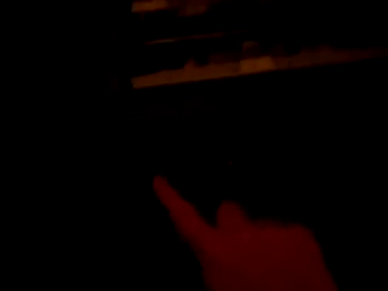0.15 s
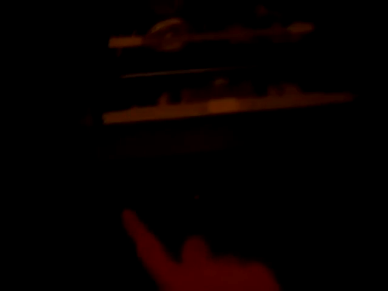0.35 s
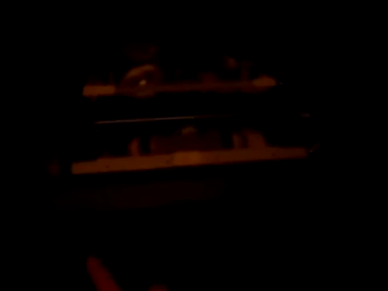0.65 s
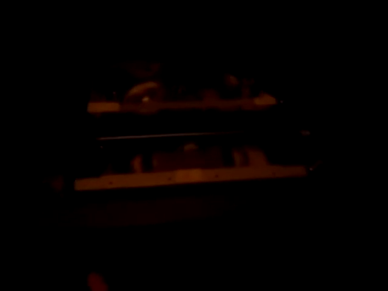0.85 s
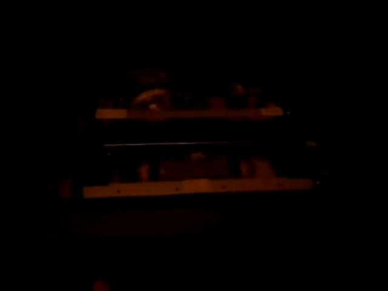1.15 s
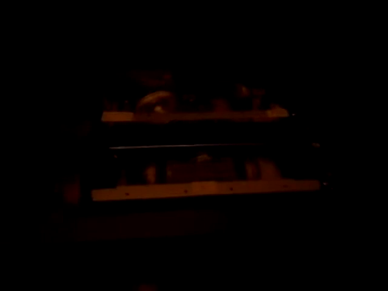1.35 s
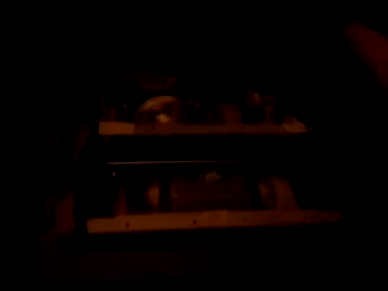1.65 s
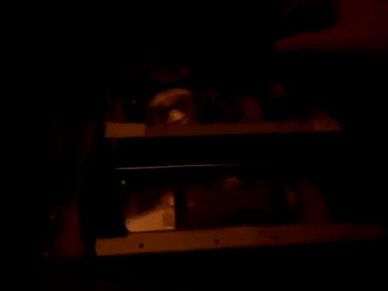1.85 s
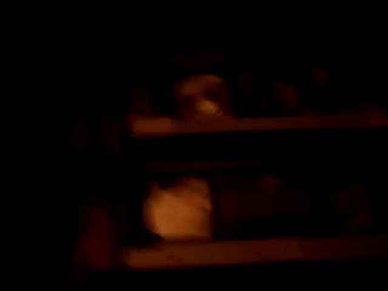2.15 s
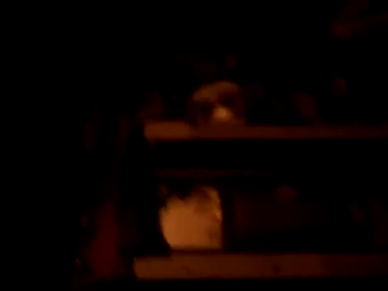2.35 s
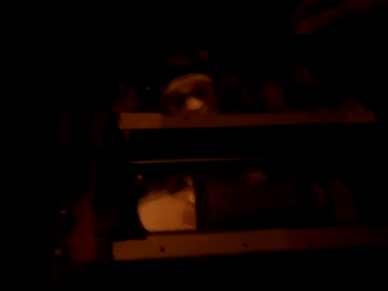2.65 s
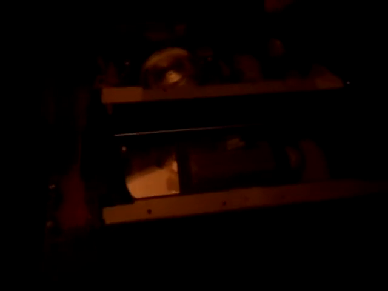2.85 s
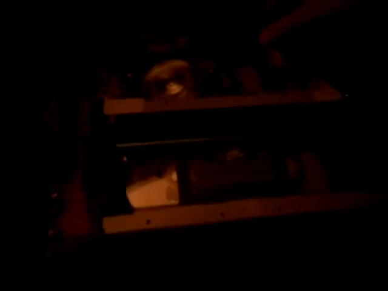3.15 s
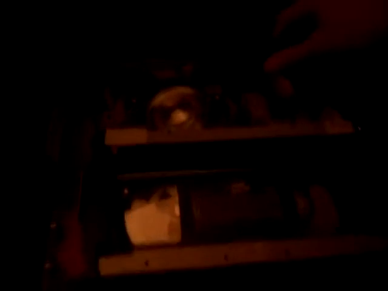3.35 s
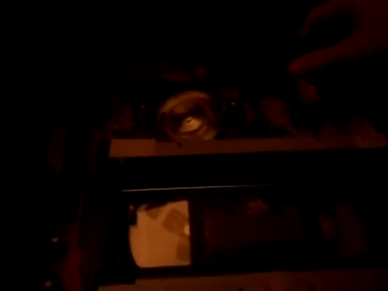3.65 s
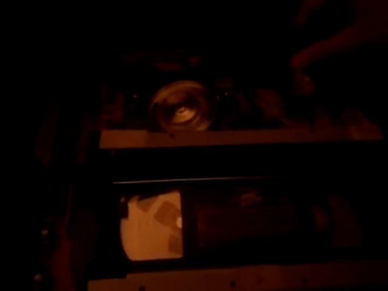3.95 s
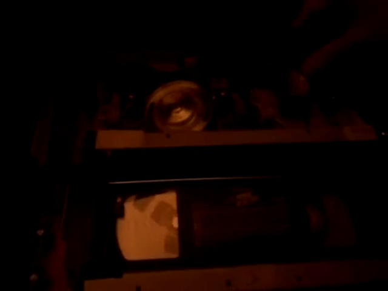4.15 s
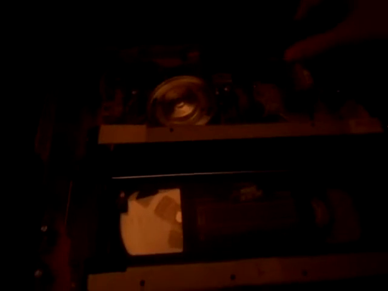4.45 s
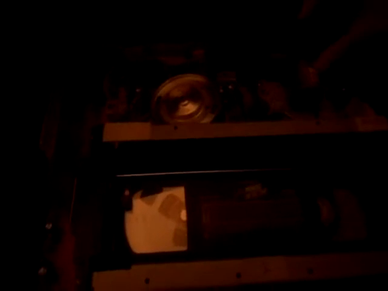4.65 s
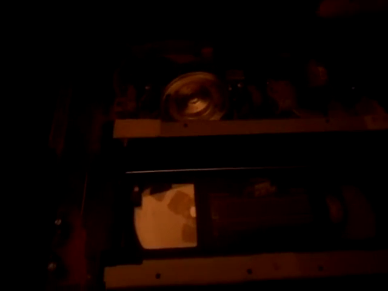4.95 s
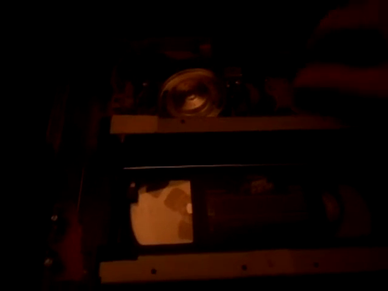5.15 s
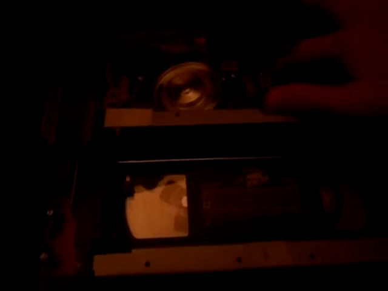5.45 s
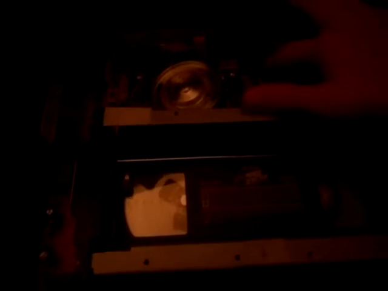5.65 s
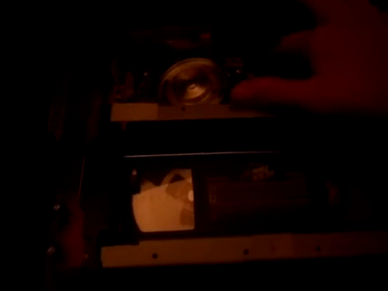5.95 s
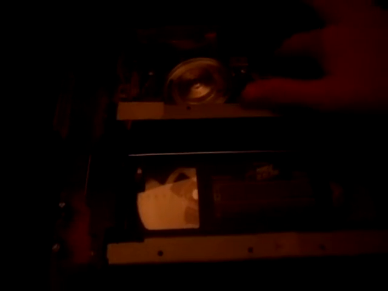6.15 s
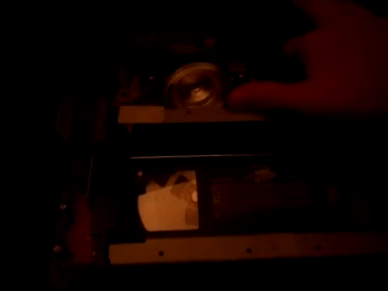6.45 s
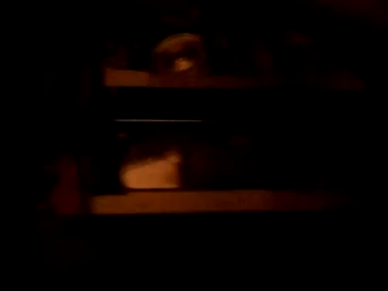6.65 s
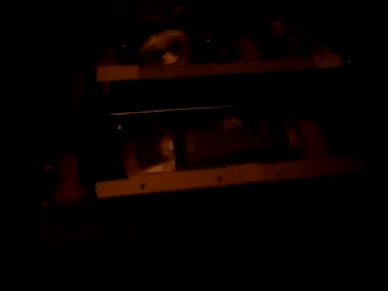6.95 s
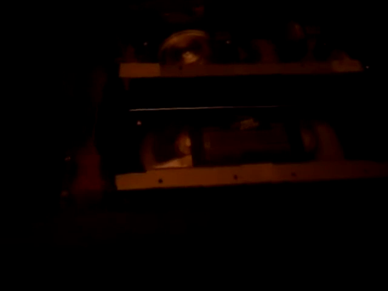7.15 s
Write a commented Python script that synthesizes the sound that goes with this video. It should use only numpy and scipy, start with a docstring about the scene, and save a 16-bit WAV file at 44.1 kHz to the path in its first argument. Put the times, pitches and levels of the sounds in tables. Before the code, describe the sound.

A straining tape-loading motor buzzes softly under a thin high whine, broken by sharp lever snaps, light rubs and small metal ticks.

```python
"""A quiet room, humming faintly, where a tape-loading mechanism strains and snaps in an open metal chassis.
Lever clacks, rubbing slides and touches ring a bank of chassis modes; small parts tick as noise bursts.
The motor is filtered gear noise, ringing brush ticks and sine tones at multiples of its turning speed.
The power supply is a thin tone near 14 kHz that wobbles with the motor and sags in surges of current."""
import sys
import numpy as np
from scipy import signal
from scipy.fft import rfft, irfft, next_fast_len
from scipy.io import wavfile
from scipy.ndimage import map_coordinates

SR = 44100
rng = np.random.default_rng(int(sys.argv[2]) if len(sys.argv) > 2 else 0)


def wrap_up_sound(samples):
    """Save the sound to the file named by the first command line argument, as 16-bit audio."""
    columns = np.atleast_2d(samples).T
    # keep every value between -1 and 1, then stretch to whole-number steps
    tamed = np.clip(columns, -1, 1)
    steps = np.round(tamed * 32767).astype(np.int16)
    wavfile.write(sys.argv[1], SR, steps)


def to_linear_factor(level_db):
    """Convert decibel levels (scalar or array-like) to linear amplitude factors."""
    exponent = np.asarray(level_db, float) / 20
    return 10 ** exponent


N = 321930


def rms_one(x):
    """Scale to rms 1."""
    return x / np.sqrt(np.mean(x ** 2) + 1e-20)


def in_time(rows):
    """Join the (time, value) points with straight lines, giving a value at every sample."""
    times, values = np.transpose(rows)
    return np.interp(np.arange(N) / SR, times, values)


def at_hz(points, hz):
    """Read a curve of (frequency, value) points on a log-frequency axis."""
    point_hz, values = np.transpose(points)
    return np.interp(np.log(hz + 1e-9), np.log(point_hz), values)


def shaped(x, points):
    """Colour a steady signal by a spectrum in dB, then scale it to rms 1."""
    size = next_fast_len(N)
    gain = to_linear_factor(at_hz(points, np.fft.rfftfreq(size, 1 / SR)))
    return rms_one(irfft(rfft(x, size) * gain, size)[..., :N])


def drift(rate):
    """Slow random wander with a spread near 1, through `rate` random points per second."""
    knots = rng.standard_normal(int(8 * rate) + 3)
    return map_coordinates(knots, [np.arange(N) / SR * rate], order=3)


def sides(x, pan_db):
    """Place a sound left (positive dB) or right; the left is part of a sample late, so a little duller."""
    lag = 0.75
    left = lag * np.roll(x, 1) + (1 - lag) * x
    return np.array([left * to_linear_factor(pan_db / 2), x * to_linear_factor(-pan_db / 2)])


def gate(start, end, fade):
    """1 between two times, with sloping edges."""
    t = np.arange(N) / SR
    return np.clip(np.minimum(t - start, end - t) / fade, 0, 1)


# Colour of the room noise: (frequency [Hz], relative level [dB per Hz])
AIR_COLOUR = [(12, -31), (20, -16), (43, -3), (90, -10), (112, -6.5), (294, -4.5), (481, -6), (650, -4.5),
              (706, -5), (1740, -9), (1890, -10), (4680, -16.5), (14000, -31)]
# How alike left and right are: (frequency [Hz], likeness [0 to 1])
AIR_LIKENESS = [(60, 0.87), (200, 0.51), (640, .15), (3000, 0.084)]
# Distant appliances: (frequency [Hz], width [Hz], level before a 1 dB lift [dB])
HUMS = [(55.8, 2.94, -76), (119, 1.7, -79)]


def air():
    """Room noise, most alike on both sides in the bass, with two narrow hums that wander in pitch and level."""
    hz = np.fft.rfftfreq(N, 1 / SR)
    alike = np.clip(at_hz(AIR_LIKENESS, hz), 0, 1)
    mid, side = rfft(rng.standard_normal((2, N)))
    pair = irfft(np.sqrt(1 + alike) * mid + np.sqrt(1 - alike) * side * [[1], [-1]], N)
    out = to_linear_factor(-62) * shaped(pair, AIR_COLOUR)
    for hum_hz, width, hum_db in HUMS:
        phase = np.cumsum(hum_hz + 0.3 * width * drift(width)) / SR
        level = to_linear_factor(hum_db + 1 + 2.0 * drift(2.17))
        out += sides(level * np.sin(2 * np.pi * phase), 3.8)
    return out


# Main ringing modes of chassis and levers: (frequency [Hz], relative level [dB], time to fall 60 dB [s])
BODY = [(253, -56, 0.026), (392, -34, 0.28), (563.5, -5, 0.068), (686, -19.5, 0.016), (821, 0.5, 0.052),
        (895, -6.5, 0.1), (1243, -2, 0.09), (1315, -11, 0.053), (1470, 4.5, 0.051), (1987, 0, 0.077),
        (2120, 3.5, 0.01), (2470, 11.5, 0.016), (2340, -18, 0.0099), (2882, 16, 0.0067), (3960, 9, 0.018),
        (5465, 5, 0.021), (7630, 4, 0.029)]
# The crowd of small panel modes between them: (frequency [Hz], relative level [dB], time to fall 60 dB [s])
PANELS = [(196, -31, 0.076), (400, -14, 0.13), (800, -8.5, 0.066), (1840, -3.5, 0.048), (4000, -0.5, 0.036),
          (7700, -2.5, 0.011), (15100, 2.5, 0.017)]


def chassis_modes():
    """Each mode is a decaying sine; a dense, uneven crowd of panel modes fills in around the main ones."""
    crowd = np.geomspace(200, 15000, 160) * (1 + .01 * rng.standard_normal(160))
    body_hz, body_db, body_t60 = np.transpose(BODY)
    panels = np.array(PANELS)
    hz = np.append(body_hz, crowd)
    mode_db = np.append(body_db, at_hz(panels[:, :2], crowd))
    t60 = np.append(body_t60, at_hz(panels[:, ::2], crowd))
    t = np.arange(SR // 6) / SR
    decay = to_linear_factor(mode_db[:, None] - 60 * t / t60[:, None])
    return hz, np.sin(2 * np.pi * hz[:, None] * t) * decay


def blow(rings, hz, ring_hz, low_db, high_db):
    """One blow and a few milliseconds of smaller touches set all the modes ringing."""
    # low share less 3 dB at the bottom; the crack near 3.5 kHz partly follows the high share
    colour = at_hz([(300, low_db - 3), (700, low_db), (1500, -10), (3500, -7 + 0.37 * high_db),
                    (7000, high_db)], hz)
    # modes close to the strongest ring (within about 0.16 octave) gain up to 9 dB
    colour += 9.0 * np.exp(-(np.log2(hz / ring_hz) / 0.16) ** 2)
    scatter_db = 2.5 * rng.standard_normal(len(hz))
    strength = to_linear_factor(colour + scatter_db) * rng.choice([-1, 1], len(hz))
    t = np.arange(300) / SR
    touches = 0.18 * rng.standard_normal(300) ** 3 / 10 * np.exp(-t / 0.00356)
    touches[0] = 1   # the blow itself
    return signal.fftconvolve(strength @ rings, touches)


# Lever clacks: (time [s], peak level before panning and bass cut [dB], strongest ring [Hz],
# low share [dB], high share of the first blow [dB], shudder [s])
CLACKS = [(0.602, -11, 2570, -31.5, -11.5, .009), (0.799, -16, 1320, -25.5, -21, 0.0037),
          (2.0, -21, 910, 1.5, -10, 0.0028), (2.005, -7.5, 7630, -16, -5, 0.0041),
          (2.022, -19.5, 1030, -9.5, -8, 0.0057), (2.346, -19.5, 875, -14, -13.5, 0.0029),
          (2.46, -33.5, 875, -12.5, -24, 0.0017), (2.513, -30.5, 864, -11, -18.5, 0.0014),
          (2.562, -32.5, 880, -11, -22, 0.0021), (3.582, -14.5, 1730, -14, -3, 0.0054),
          (3.588, -17.5, 686, -1.5, -6.5, 0.0078), (3.754, -30.5, 533, -7, -17.5, 0.0021),
          (4.11, -47, 1091, -4, -16, 0.0027), (4.144, -29.5, 650, -2, -16.5, .012),
          (4.162, -29, 872, 1, -20.5, .008), (4.739, -27.5, 3960, -2, -15, .006),
          (4.744, -25.5, 705, -1, -14.5, 0.031), (5.414, -43, 1090, -7, -42, 0.0017),
          (5.526, -38, 1445, 0.5, -27, 0.0018), (6.055, -43, 1320, 3, -14, 0.0018),
          (6.477, -8, 1350, -9.5, -5.5, 0.0029), (6.481, -10.5, 786, -2, -14.5, .005),
          (6.6, -30, 1470, -11, -20, 0.0024), (6.625, -33.5, 1210, -1.5, -9.5, 0.0017),
          (6.73, -42, 1470, -7, -20, 0.0022), (6.756, -47.5, 845, -30, -23, .002),
          (6.919, -25, 4570, -21, -10, 0.0032), (6.929, -27, 1680, -10.5, -15, .003),
          (6.977, -31, 1500, -20, 5, 0.0019)]


def clacks(rings, hz):
    """A lever strikes, then strikes again four times within its shudder, softer and duller."""
    out = np.zeros((2, N + SR))
    for s, peak_db, ring_hz, low_db, high_db, shudder in CLACKS:
        clack = np.zeros(SR // 4)
        for k in range(5):
            again = k > 0
            hit = blow(rings, hz, ring_hz, low_db, high_db - 8 * again)
            uneven = 1 + .1 * np.tanh(rng.standard_normal())
            late = round(shudder * k / 4 * uneven * SR)
            clack[late:late + len(hit)] += hit * to_linear_factor((-3.5 - 1.1 * k) * again)
        # blows with a small low share sound thin: the bass cut rises
        cut_hz = np.clip(190 * to_linear_factor(-0.34 * low_db), 50, 1200)
        clack = signal.lfilter(*signal.butter(2, cut_hz, "high", fs=SR), clack)
        # clacks lean left, the brightest ones less so
        pan_db = 2.0 - 0.16 * max(high_db + 9.5, 0)
        at = round(s * SR)
        out[:, at:at + len(clack)] += to_linear_factor(peak_db) * sides(clack / np.abs(clack).max(), pan_db)
    return out[:, :N]


def room(x):
    """Dull reflections, mostly shared by both sides, start after 4 ms and fall 60 dB in 0.18 s."""
    t = np.arange(SR // 3) / SR
    white = rng.standard_normal((3, len(t)))
    tail = signal.lfilter(*signal.butter(1, 3770.0, fs=SR), white[0] + 0.58 * white[1:])
    tail = tail * to_linear_factor(-60 * t / 0.18) * (t > .004)
    tail = tail / np.sqrt(np.sum(tail ** 2) / 2)
    return to_linear_factor(-18) * signal.fftconvolve(x, tail, axes=1)[:, :N]


# Loudness of the motor's gear noise, with a brief rattle swelling it at 2.2 s and another near 6.7 s:
# (time [s], level [dB])
WHIR = [(0.62, -54.5), (0.77, -61), (1.83, -60.5), (2.07, -60.5), (2.2, -55), (2.57, -59.5), (2.8, -62),
        (3.28, -61), (4.12, -56), (5.42, -57), (5.53, -58.5), (6.312, -56.5), (6.54, -56), (6.72, -56),
        (7.075, -56), (7.11, -75), (7.25, -77), (7.265, -57.5), (7.3, -57)]


def whir_db():
    """Loudness of the gear noise in dB, rising from silence at 0.6 s."""
    return in_time([(.6, -110)] + WHIR)


# Colour of the gear noise: (frequency [Hz], relative level [dB per Hz])
WHIR_COLOUR = [(150, -42), (250, -32), (420, -4.5), (620, -0.5), (850, -3), (1090, 1.5), (1170, 2),
               (1270, 5.5), (1400, 2), (1750, -8), (2600, -8), (3500, -15), (6000, -21.5), (6700, -34.5),
               (8500, -27), (10500, -24), (11900, -23), (13200, -24), (14500, -11)]


def gear_noise():
    """Meshing gears give a coloured noise that follows the loudness table, 1.5 dB softer on the right."""
    white = rng.standard_normal((3, N))
    noise = shaped(white[0] + 0.27 * white[1:], WHIR_COLOUR)
    return to_linear_factor(whir_db() + .7 * drift(9.0)) * noise * to_linear_factor([[0], [-1.5]])


# Ringing of the brushes as they cross a gap:
# (frequency [Hz], level at median gear loudness before panning [dB], time to fall 60 dB [s])
BRUSH = [(2830, -74, 0.009), (6800, -79.5, 0.0038), (8500, -84, 0.0067), (12000, -75.5, 0.0034)]


def brushes(turns):
    """A tick at every half turn, of uneven strength, rings a few small modes; louder with the gear noise."""
    gaps = np.diff(np.floor(2 * turns), prepend=0)
    out = 0
    for hz, ring_db, t60 in BRUSH:
        kicks = gaps * to_linear_factor(2.0 * rng.standard_normal(N)) + 1e-18
        r, w = to_linear_factor(-60 / (t60 * SR)), 2 * np.pi * hz / SR   # decay per sample, angle per sample
        ring = signal.lfilter([0, 1], [1, -2 * r * np.cos(w), r * r], kicks)
        out = out + to_linear_factor(ring_db) * rms_one(ring)
    loudness_db = whir_db()
    return sides(to_linear_factor(loudness_db - np.median(loudness_db)) * out, 0.77)


# Motor shaft, slowing as the load builds and leaping when a lever lets go: (time [s], speed [turns per s])
SHAFT = [(0.65, 70), (0.9, 67.6), (1.2, 64.58), (1.44, 63.12), (1.9, 60.54), (2.6, 57.4), (3.24, 55.42),
         (3.84, 54.1), (4.1, 52), (4.29, 58.74), (4.7, 54), (4.89, 61.34), (5.49, 57.72), (5.79, 56.7),
         (5.92, 57), (6.33, 64)]
USUAL_TURNS = 58   # turns per s around which the rules for shaft and supply tones are given


def shaft():
    """Speed of the shaft in turns per second, and the turns made so far."""
    speed = in_time(SHAFT)
    return speed, np.cumsum(speed) / SR


# Resonances of the motor mount: (frequency [Hz], width [Hz], relative level [dB])
MOUNT = [(408, 27, -6.5), (565, 140, -2), (773, 72, -8), (880, 42, 1), (1096, 73, 0.5), (1238, 110, 0),
         (1450, 430, -8.5), (2470, 170, -11.5)]
# When the shaft tones are heard: (from [s], to [s])
SHAFT_TONES_ON = (.63, 6.1)


def shaft_tones(speed, turns):
    """Tones at whole multiples of the shaft speed, odd ones stronger, pass through the mount; louder when fast."""
    tones = 0
    for order in range(5, 48):
        hz = order * speed[::64]   # the mount's gain is worked out every 64 samples
        power = sum(to_linear_factor(2 * mount_db) / (1 + (2 * (hz - mount_hz) / width) ** 2) ** 2
                    for mount_hz, width, mount_db in MOUNT)
        even_db = -14.0 * (order % 2 == 0)
        gain = np.repeat(np.sqrt(power), 64)[:N] * to_linear_factor(even_db + 1.5 * drift(2.85))
        tones = tones + gain * np.sin(2 * np.pi * (order * turns + rng.random()))
    level = to_linear_factor(-59.5 + .2 * (speed - USUAL_TURNS))
    return gate(*SHAFT_TONES_ON, .15) * level * sides(rms_one(tones), 2.5)


# Surges of current: (time of the lowest pitch [s], depth [Hz], strain [s], recovery [s])
SURGES = [(.645, 1895, 0.018, .035), (4.116, 1800, 0.16, 0.049), (4.69, 1970, 0.13, 0.047),
          (6.145, 1340, 0.099, 0.076), (6.57, 2640, 0.073, .05), (7.267, 3060, 0.025, 0.086)]


def sag_khz():
    """How far the surges pull the supply tone down: slow strain, a plunge, a quick recovery."""
    out = 0
    strain_share = .33   # part of the depth reached by slow strain
    for s, depth_hz, strain, recovery in SURGES:
        t = np.arange(N) / SR - s
        slow = strain_share * np.exp(-(t / strain) ** 4)
        plunge = (1 - strain_share) * np.exp(-(t / (strain * .38)) ** 2)
        after = np.exp(-(t / recovery) ** 2)
        out = out + depth_hz / 1000 * np.where(t < 0, slow + plunge, after)
    return out


# When the supply whines: (from [s], to [s])
WHINE_ON = [(.64, 6.66), (7.256, 8.8)]


def supply(speed, turns):
    """The switching tone rises with a freer motor, sags in surges and wobbles twice a turn with the current."""
    sag = sag_khz()
    faster = speed - USUAL_TURNS
    ripple = np.sin(4 * np.pi * turns)
    hz = 13990 + 55 * faster - 1000 * sag + 197.0 * ripple + 30.0 * drift(280.0)
    tone = np.sqrt(2) * (1 + 0.57 * ripple) * np.sin(2 * np.pi * np.cumsum(hz) / SR)
    # louder in a surge, a little softer when the motor is fast
    level_db = -67.5 + 3 * sag - 0.2 * faster + 2.0 * drift(19.0)
    on = sum(gate(start, end, 0.0034) for start, end in WHINE_ON)
    return sides(on * to_linear_factor(level_db) * tone, 0.0)


# Rubbing slides: (start [s], length [s], rms level before panning and bass cut [dB], brightness [Hz])
RUBS = [(1.349, 0.048, -61, 4000), (2.178, 0.052, -45.5, 4000), (2.267, 0.029, -49, 2510),
        (3.452, 0.031, -57, 9000), (3.946, 0.059, -59.5, 1500), (5.013, 0.055, -58, 4500),
        (6.204, 0.056, -53.5, 4000), (6.926, 0.072, -51, 2500)]


def rubs(rings, hz):
    """Sliding parts give twelve tiny touches per slide, each exciting the modes differently."""
    out = np.zeros(N + SR)
    for start, length, rub_db, bright_hz in RUBS:
        slide = np.zeros(N + SR)
        for share in np.arange(12) / 12:
            at = round((start + length * (share + .03 * rng.standard_normal())) * SR)
            touch = rng.standard_normal(len(hz)) / np.hypot(1, hz / bright_hz) @ rings
            swell = np.sin(np.pi * (share + 0.016)) ** .5
            slide[at:at + len(touch)] += touch * swell * to_linear_factor(2.0 * rng.standard_normal())
        out += to_linear_factor(rub_db) * slide / np.sqrt(np.sum(slide ** 2) / round(length * SR))
    return sides(out[:N], 2.1)


# Short bright ticks of small parts:
# (time [s], peak level before panning and bass cut [dB], left over right [dB])
TICKS = [(2.2715, -24.5, 9), (5.38, -41.5, 6), (6.2434, -44, 14), (6.669, -36, 0.5), (6.6817, -42.5, 3),
         (6.9553, -26, -0.5), (7.1835, -30.5, 7.5)]


def ticks():
    """A bright burst of noise that dies within a few milliseconds."""
    out, t = np.zeros((2, N)), np.arange(600) / SR
    for s, peak_db, pan_db in TICKS:
        burst = rng.standard_normal(600) * np.exp(-t / 0.001)
        burst = signal.lfilter(*signal.butter(2, 1500.0, "high", fs=SR), burst)
        at = round(s * SR)
        out[:, at:at + 600] += to_linear_factor(peak_db) * sides(burst / np.abs(burst).max(), pan_db)
    return out


def scene():
    """The mechanism in its room; only clacks, rubs and ticks get reflections."""
    speed, turns = shaft()
    hz, rings = chassis_modes()
    hits = clacks(rings, hz) + rubs(rings, hz) + ticks()
    # the small chassis radiates little bass
    hits = signal.sosfilt(signal.butter(2, 170.0, "high", fs=SR, output="sos"), hits)
    motor = gear_noise() + brushes(turns) + shaft_tones(speed, turns)
    return air() + hits + room(hits) + motor + supply(speed, turns)


def low_pass(x):
    """Removes everything above the highest recorded frequency."""
    return signal.sosfilt(signal.butter(12, 15420, fs=SR, output="sos"), x)


def record(dry):
    """The treble falls away steeply above 14.2 kHz."""
    mix = signal.sosfilt(signal.ellip(8, .5, 36, 14220, fs=SR, output="sos"), dry)
    return low_pass(mix)


dry = scene()
out = record(dry)
wrap_up_sound(out)
```